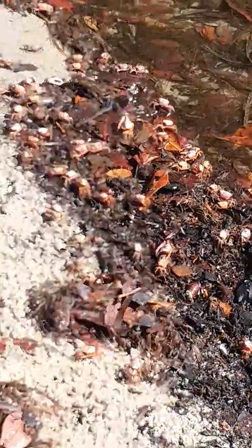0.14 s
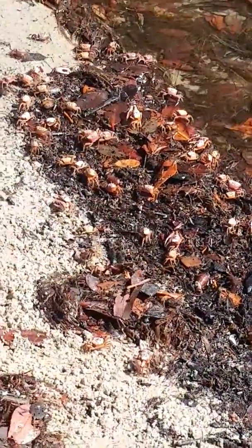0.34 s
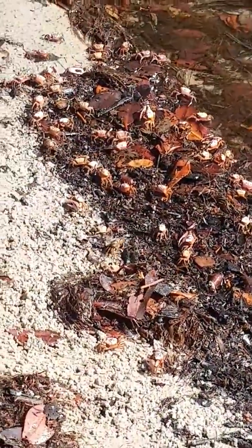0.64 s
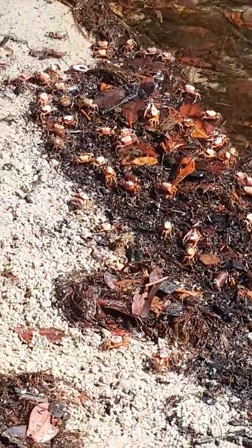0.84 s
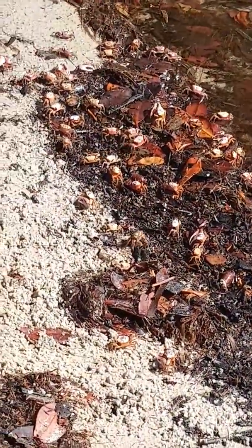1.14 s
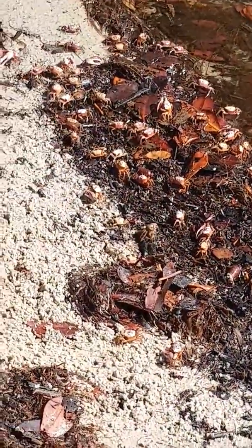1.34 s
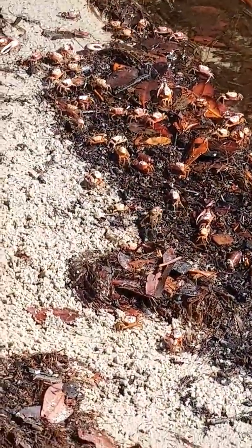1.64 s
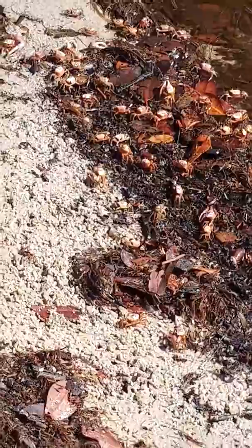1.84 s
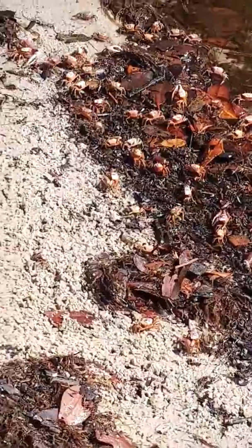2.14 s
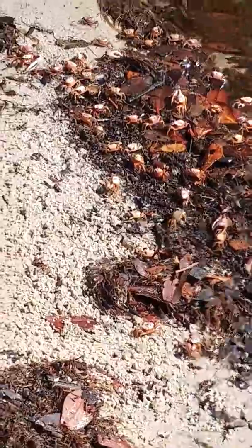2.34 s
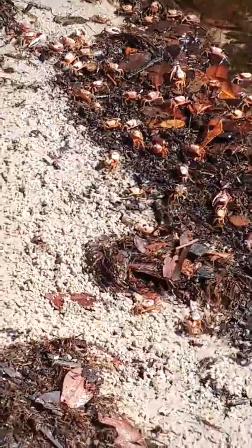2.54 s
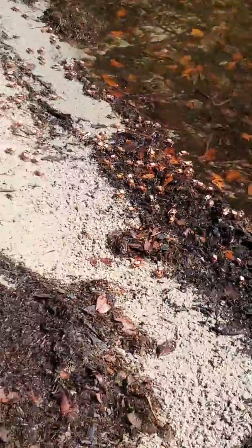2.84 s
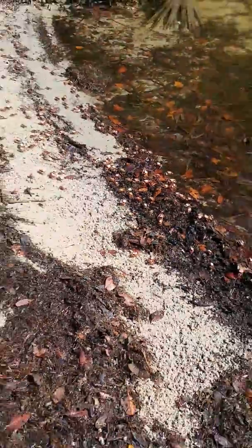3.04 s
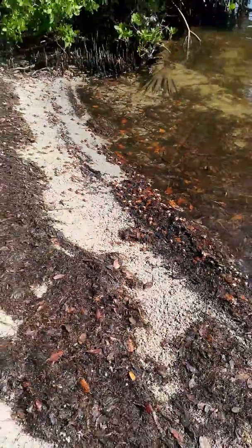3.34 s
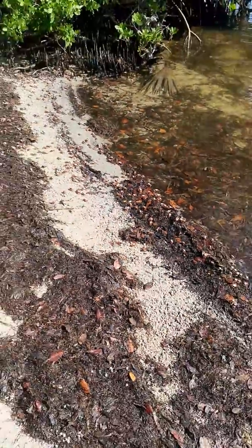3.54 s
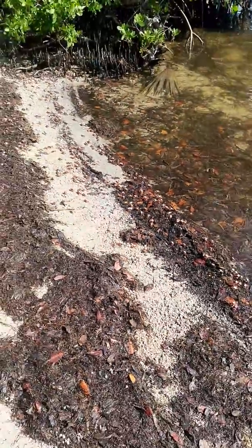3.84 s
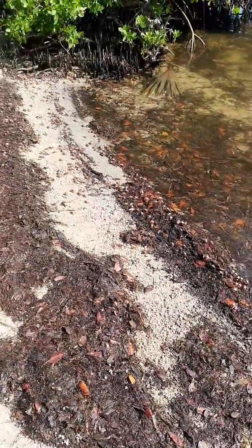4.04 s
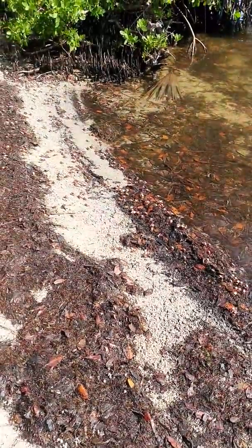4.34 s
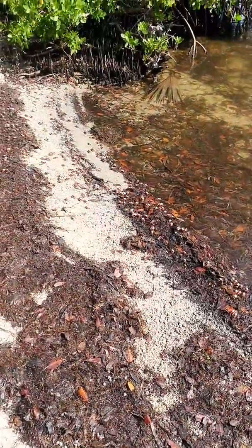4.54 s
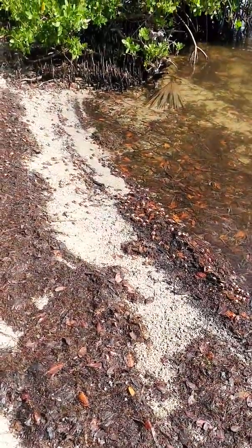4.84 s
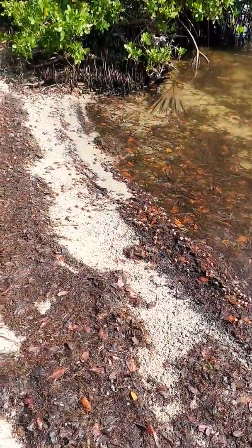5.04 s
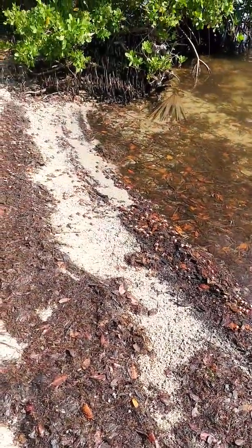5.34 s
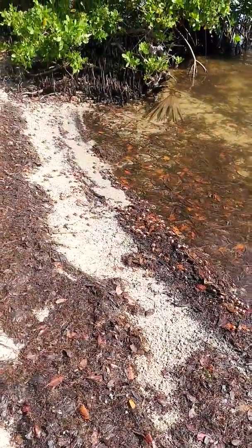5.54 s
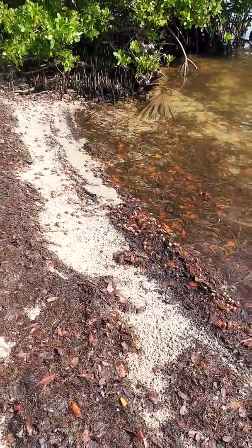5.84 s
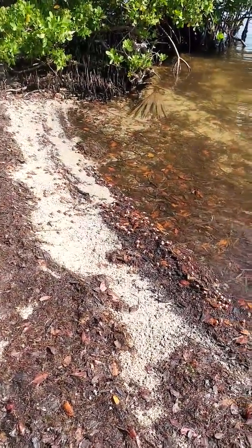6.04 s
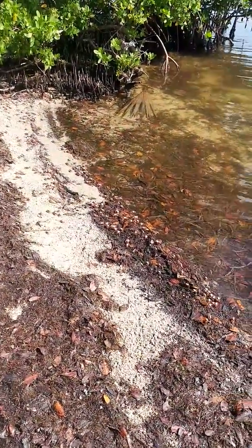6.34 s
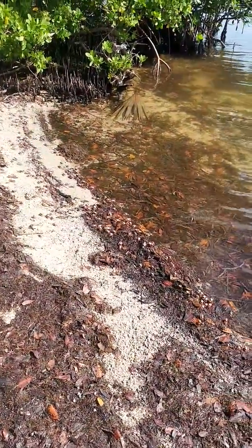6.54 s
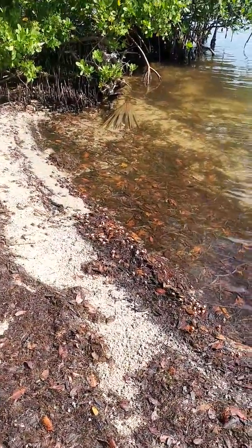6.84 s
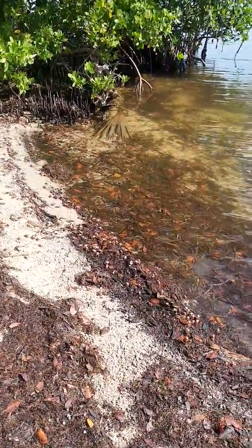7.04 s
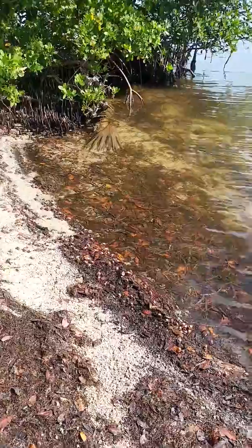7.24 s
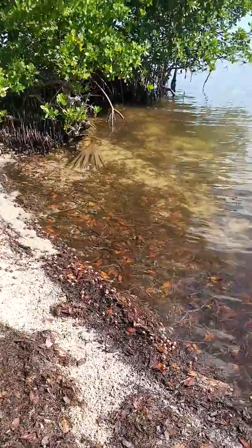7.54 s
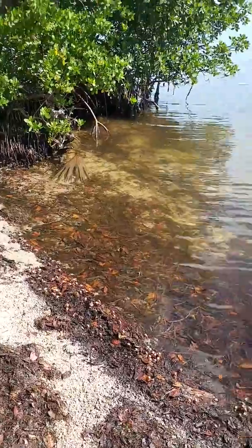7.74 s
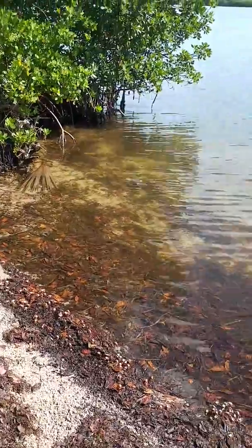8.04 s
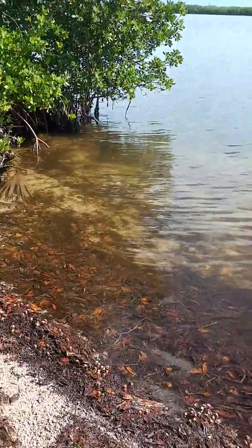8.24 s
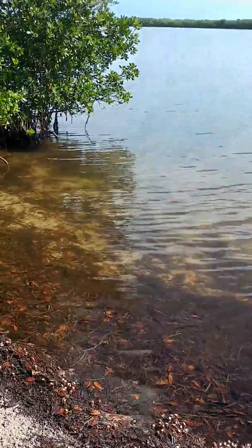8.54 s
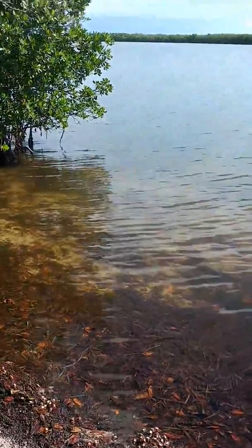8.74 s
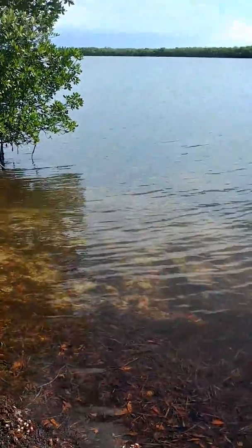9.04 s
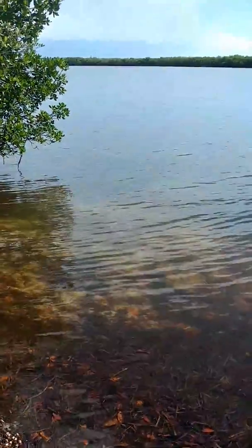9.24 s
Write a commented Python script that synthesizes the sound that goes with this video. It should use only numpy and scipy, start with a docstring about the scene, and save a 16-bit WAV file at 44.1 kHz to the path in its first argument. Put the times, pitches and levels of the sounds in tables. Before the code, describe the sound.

Outdoors at a shore, a katydid whines continuously over a brighter insect sizzle, while wind buffets the microphone at the beginning and near the end.

```python
"""A near katydid buzzes at about 8 kHz on the right and a higher chorus sizzles on the left of a mangrove shore.
Both are wing strokes, rasp and snaps, coloured by spectra; resonances on the strokes add whines and wing tones.
The katydid drops briefly four times. Gusts of banded noise buffet two microphone ports; short swings thump them.
A faint far rumble of dull noise lies over the water; later, short bands of grainy noise lap as ripples."""
import sys
import numpy as np
from scipy import signal
from scipy.fft import rfft, irfft, next_fast_len
from scipy.io import wavfile
from scipy.ndimage import uniform_filter1d

SR = 44100
rng = np.random.default_rng(int(sys.argv[2]) if len(sys.argv) > 2 else 0)


def bounce(signal):
    """Save signal as a 16-bit WAV file at the path given by the first command-line argument."""
    frames = np.transpose(np.atleast_2d(signal))
    limited = np.clip(frames, -1, 1)
    pcm = np.round(limited * 32767).astype(np.int16)
    wavfile.write(sys.argv[1], SR, pcm)


N = 413658
TIME = np.arange(N) / SR
FFT_SIZE = next_fast_len(N, real=True)
FFT_HZ = np.fft.rfftfreq(FFT_SIZE, 1 / SR)


def gain_of(db):
    """Decibels to amplitude."""
    return 10 ** (np.asarray(db) / 20)


def evened(x):
    """Scales to rms 1."""
    return x / np.sqrt(np.mean(x ** 2) + 1e-20)


def steadied(x, size_samples):
    """Holds each channel at its own mean level, over spans of size_samples."""
    power = x ** 2
    mean_power = power.mean(1, keepdims=True)
    local_power = uniform_filter1d(power, size_samples) + 1e-20
    return evened(x * np.sqrt(mean_power / local_power))


def curves(rows):
    """Each column of a table as a curve over time."""
    time_s, *columns = np.transpose(rows)
    return [np.interp(TIME, time_s, column) for column in columns]


def colour(x, rows):
    """Filters by a spectrum with one column, or one per channel; rms 1."""
    hz, *columns = np.transpose(rows)
    shape_db = [np.interp(np.log(FFT_HZ + 1), np.log(hz), column) for column in columns]
    spectrum = rfft(x, FFT_SIZE) * gain_of(shape_db)
    return evened(irfft(spectrum, FFT_SIZE)[:, :N])


def band_noise(low_hz, high_hz, order):
    """Noise between two edges, unrelated in the two channels; rms 1."""
    edges = signal.butter(order, [low_hz, high_hz], "bandpass", fs=SR, output="sos")
    return evened(signal.sosfilt(edges, rng.standard_normal((2, N))))


def drift(hz):
    """Slow chance of rms 1, up to the given rate."""
    knots_s = np.arange(0, TIME[-1] + 1 / hz, .5 / hz)
    return evened(np.interp(TIME, knots_s, rng.standard_normal(len(knots_s))))


def hump(middle_s, length_s):
    """A smooth rise and fall of height 1, length_s wide at 1/e."""
    out = np.zeros(N)
    near = slice(*np.searchsorted(TIME, [middle_s - 2 * length_s, middle_s + 2 * length_s]))
    out[near] = np.exp(-(2 * (TIME[near] - middle_s) / length_s) ** 2)
    return out


def resonate(x, hz, width_hz):
    """A steep moving resonance of gain 1: shift the curve hz down to zero, smooth twice, shift back."""
    turn = np.exp(2j * np.pi * np.cumsum(hz) / SR)
    r = np.exp(-np.pi * width_hz / SR)
    smooth = signal.lfilter([(1 - r) ** 2], [1, -2 * r, r * r], x * turn.conj())
    return 2 * (turn * smooth).real


def foliage(x, spread_s, count):
    """Scattered reflections from leaves, roots and ground, different at each ear."""
    taps = np.zeros((2, SR // 4))
    for ear in taps:
        delay = np.minimum(rng.exponential(spread_s, count) * SR, len(ear) - 1).astype(int)
        ear[delay] = rng.standard_normal(count)
        ear /= np.linalg.norm(ear)
    return signal.oaconvolve(x[None], taps, axes=1)[:, :N]


def shifting_echoes(x, spread_s, rad_per_s):
    """Two sets of reflections trade places as the listener moves."""
    turn = rad_per_s * TIME
    first = foliage(x, spread_s, count=24)
    second = foliage(x, spread_s, count=24)
    return np.cos(turn) * first + np.sin(turn) * second


PORT_LAG_S = .00045


def at_ports(x):
    """The song reaches the right port a moment after the left."""
    return np.array([x, np.roll(x, round(PORT_LAG_S * SR))])


def stridulate(strokes_per_s, width, rasp, jitter, uneven_db):
    """Each wing stroke drags a scraper over a file: a swell of rasp with one hard snap at its middle."""
    # width and jitter in strokes; rasp is its share of the power
    turns = np.cumsum(strokes_per_s * np.ones(N)) / SR + rng.random() + jitter * drift(60)
    snaps = np.diff(np.floor(turns + .5), prepend=np.floor(turns[0] + .5))
    teeth = np.exp(-abs(turns % 1 - .5) / width) * rng.standard_normal(N)
    strokes = np.sqrt(1 - rasp) * evened(snaps) + np.sqrt(rasp) * evened(teeth)
    return evened(strokes * gain_of(uneven_db * drift(77)))


# katydid pauses: middle_s, length_s, depth_db
PAUSES = [(3.312, 0.032, -11), (4.187, 0.084, -13), (7.157, 0.071, -15), (7.983, 0.047, -22)]


def resting_db():
    """How far the near singer's level drops as it pauses."""
    return sum(depth_db * hump(middle_s, length_s) for middle_s, length_s, depth_db in PAUSES)


def whine(strokes, hz, wander_hz=20, left_db=-11):
    """One wing rings at its own wandering pitch under the strokes; the left side hears it only by reflection."""
    ring = resonate(strokes, hz + wander_hz * drift(2.8), width_hz=300)
    ring = ring / np.sqrt(uniform_filter1d(ring ** 2, size=2400) + 1e-12)
    reflection = gain_of(left_db) * np.roll(ring, SR // 54)
    return np.array([reflection, ring])


# katydid buzz loudness: time_s, relative_db
KATYDID_LOUDNESS = [(0, 0), (0.28, -3), (0.9, -2), (1.55, 1), (1.8, 1), (2.5, 1), (3.08, 0), (3.25, -1),
                    (3.6, 1), (3.8, -1.5), (4.45, 1), (4.9, -2), (5.4, 0.5), (5.95, 0), (6.85, 0),
                    (7.31, 0.5), (7.59, 2), (7.8, 1.5), (8.4, -0.5), (8.62, 0.5), (8.9, -1.5), (9.38, -0.5)]
# ring of its wings, spectrum shape: pitch_hz, left_relative_db, right_relative_db
WING_RING = [(4000, -140, -140), (4950, -123, -119), (5400, -105, -98.5), (6000, -104, -99.5),
             (6500, -101, -97), (6750, -95, -86), (7100, -86, -75), (7400, -83, -72), (7650, -79, -68),
             (8150, -76, -66.5), (8450, -74, -68.5), (8800, -80, -78), (9150, -76, -78),
             (10200, -69, -75.5), (12000, -72, -79.5), (13000, -80, -88), (14600, -83, -90),
             (15600, -87, -100)]
# whine of its two wings, before pauses and flutter: time_s, lower_hz, lower_db, upper_hz, upper_db
WING_WHINES = [(0, 7780, -48, 8150, -37), (.3, 7780, -49, 8130, -42), (1.1, 7900, -40, 8120, -34.5),
               (1.55, 7870, -33, 8130, -30.5), (1.8, 7850, -40, 8060, -38), (2.1, 7850, -40, 8080, -33),
               (2.55, 7900, -37, 8080, -31), (3.1, 7900, -35, 8070, -31), (3.27, 7800, -37, 8100, -39),
               (3.55, 7800, -37, 8160, -31.5), (4.1, 7750, -42, 8120, -39), (4.6, 7720, -39, 8080, -37.5),
               (5.6, 7750, -46, 8080, -38), (5.9, 7720, -42, 8100, -46), (6.3, 7690, -33, 8080, -40),
               (6.78, 7620, -29.5, 8150, -35), (6.95, 7630, -32.5, 8200, -30.5),
               (7.28, 7700, -43, 8150, -42), (7.58, 7700, -31.5, 8100, -34.5), (7.85, 7700, -36, 8150, -39),
               (8.4, 7800, -34, 8180, -33), (8.62, 7800, -39, 8170, -38), (8.9, 7800, -30.5, 8180, -31),
               (9.1, 7850, -30, 8120, -35), (9.38, 7800, -37, 8170, -37)]
# slowing around a pause: depth, and time either side
STROKES_PER_S, SAG_PER_S, SAG_S = 108.2, 3, .11


def katydid(level_db=-33.0, scatter_db=0.0, flutter_db=0.58):
    """The near singer: a fast buzz that slows around each pause, with a whine from each of its two wings."""
    sag = SAG_PER_S * sum(hump(middle_s, 2 * SAG_S) for middle_s, _, _ in PAUSES)
    rate = STROKES_PER_S - sag + .15 * drift(1.5)
    song = stridulate(rate, width=.2, rasp=.76, jitter=.003, uneven_db=.6)
    echoes = shifting_echoes(song, spread_s=.004, rad_per_s=1.473)
    buzz = colour(at_ports(song) + gain_of(scatter_db) * echoes, WING_RING)
    strokes = np.roll(buzz[1], round(3 * SR / STROKES_PER_S))  # three strokes late
    # the singer keeps an even effort
    buzz = steadied(buzz, size_samples=2000) * gain_of(level_db + curves(KATYDID_LOUDNESS)[0])
    low_hz, low_db, high_hz, high_db = curves(WING_WHINES)
    whines = gain_of(low_db) * whine(strokes, low_hz) + gain_of(high_db) * whine(strokes, high_hz)
    return (buzz + whines) * gain_of(resting_db() + flutter_db * drift(7))


# wing tones drifting through the chorus: pitch_hz, start_relative_db, end_relative_db
WING_TONES = [(10150, -2, -3), (10480, 0, 0), (10800, 1.5, -5), (11030, -3, 0), (11270, -3, -3),
              (11680, -2, -1), (12150, -6, -6)]


def wing_tones(song, level_db, right_db=-21):
    """Narrow wing tones, mostly on the left, wander in pitch; each swells and sinks on its own."""
    out = np.zeros(N)
    for hz, start_db, end_db in WING_TONES:
        tone = resonate(song[:1], hz + 65 * drift(1.5), width_hz=160)
        tone = steadied(tone, size_samples=3000)[0]
        swell = evened(gain_of(3.5 * drift(2.5)))
        out += tone * swell * np.geomspace(gain_of(start_db), gain_of(end_db), N)
    return gain_of(level_db) * gain_of([[0], [right_db]]) * at_ports(out)


# leading singers: strokes_per_s, relative_db
CHORUS_LEADERS = [(98.1, 0), (108.3, -2), (89.3, -6), (117.6, -6), (203, -6)]
# chorus spectrum shape: pitch_hz, left_relative_db, right_relative_db
CHORUS_COLOUR = [(4000, -140, -140), (5000, -121, -120), (6300, -107, -105), (7000, -97, -88),
                 (8000, -80, -75), (8500, -80, -80), (9100, -78, -83), (9550, -66.5, -76.5),
                 (10200, -58.5, -78), (10700, -57, -78), (11300, -58, -79), (11750, -58, -78),
                 (12700, -67, -83.5), (14400, -71.5, -86), (15600, -75.5, -95)]
# chorus swell: time_s, relative_db
CHORUS_SWELL = [(0.0, -27.5), (0.89, -27), (1.05, -29.5), (1.19, -27), (1.3, -27.5), (1.65, -26.5),
                (2.13, -27), (2.38, -26.5), (2.94, -28), (3.69, -26.5), (4.4, -28.5), (4.8, -26.5),
                (5.26, -28.5), (5.33, -27), (6.51, -27), (6.88, -26), (7.34, -29), (7.54, -27.5),
                (7.62, -29.5), (8.3, -26.5), (8.62, -29), (8.84, -26.5), (9.19, -28.5), (9.37, -27.5)]


def chorus(level_db=2.0, crowd_db=0, scatter_db=-1, waver_db=0.32, hush=0.13):
    """A few singers and wing tones stand out from a crowd blurred to a sizzle; it dips a little at each pause."""
    leaders = 0
    for strokes_per_s, db in CHORUS_LEADERS:
        rate = strokes_per_s + .3 * drift(2)
        leaders += gain_of(db) * stridulate(rate, width=.36, rasp=.93, jitter=.005, uneven_db=.6)
    leaders = evened(leaders)
    crowd = shifting_echoes(rng.standard_normal(N), spread_s=.003, rad_per_s=2.13)
    crowd = evened(crowd + 0.86 * rng.standard_normal((2, N)))
    near_echoes = foliage(leaders, spread_s=.0004, count=6)
    echoes = shifting_echoes(leaders, spread_s=.007, rad_per_s=1.94)
    song = near_echoes + gain_of(scatter_db) * echoes + gain_of(crowd_db) * crowd
    song = colour(song, CHORUS_COLOUR)
    song = song + wing_tones(np.roll(song, SR // 20, axis=1), level_db=-7.5)
    song = steadied(song, size_samples=1800)  # so many voices keep a steady sum
    swell_db = curves(CHORUS_SWELL)[0] + waver_db * drift(6) + hush * resting_db()
    return gain_of(level_db + swell_db) * song


# gusts: peak_s, length_s, left_strength_db, right_strength_db
GUST_ROWS = [(0.036, 0.062, -34, -47), (0.085, 0.059, -34.5, -41), (0.156, 0.047, -46, -42),
             (0.233, 0.031, -54, -36.5), (0.34, 0.09, -51, -40.5), (0.503, 0.054, -44, -47.5),
             (0.617, 0.099, -41.5, -51), (0.765, 0.029, -45, -66), (0.913, 0.02, -39.5, -47),
             (0.993, 0.031, -52.5, -58), (1.692, 0.064, -54.5, -75), (1.923, 0.06, -45.5, -62),
             (2.094, 0.036, -38.5, -61), (2.266, 0.025, -60, -49), (2.311, 0.041, -39, -48),
             (2.37, 0.072, -45, -53), (2.543, 0.054, -48.5, -53), (2.637, 0.065, -50.5, -56),
             (2.87, 0.059, -53.5, -74), (3.457, .04, -54.5, -63), (6.78, 0.069, -55, -75),
             (6.96, 0.046, -44, -66), (7.053, 0.073, -35.5, -61), (7.106, 0.055, -38.5, -59),
             (7.188, 0.11, -46.5, -61), (7.571, 0.13, -55, -50), (7.716, 0.049, -46.5, -43.5),
             (7.939, 0.036, -51, -38.5), (8.018, 0.074, -44, -43), (8.127, 0.024, -40.5, -36),
             (8.153, 0.065, -36, -38), (8.207, 0.08, -39.5, -38), (8.273, 0.066, -48, -39.5),
             (8.375, 0.11, -52, -47.5), (8.475, 0.078, -45, -39.5), (8.515, 0.043, -43.5, -39.5),
             (8.615, 0.059, -50.5, -61), (8.722, 0.059, -45, -38), (8.766, 0.034, -58, -37.5),
             (8.868, 0.074, -59, -39), (8.971, 0.027, -52, -40), (9.047, 0.073, -50, -47.5),
             (9.311, 0.095, -42, -35)]
# eddies in a gust, large to small: low_hz, high_hz, relative_db at full gust, growth_db_per_db of strength
EDDY_BANDS = [(51, 108.5, 2, 0.75), (107, 209.6, -3, 1.74), (205, 473, -19, 3.5), (419, 670, -31, 4.5)]
FULL_GUST_DB = -40


def wind(level_db=-40, calm_db=-64, lumpy_db=2, stir_db=-14, stir_s=0.28, stir_cap_db=-40):
    """Gusts hit each port on its own amid a longer, weaker stir; harder ones shed more small eddies."""
    power = np.full((2, N), 1e-12)
    for peak_s, length_s, *ports_db in GUST_ROWS:
        port_stir_db = stir_db + np.minimum(ports_db, stir_cap_db)  # on both sides of the peak
        for strength_db, span_s in [(ports_db, length_s), (port_stir_db, stir_s)]:
            near = slice(*np.searchsorted(TIME, [peak_s - 2 * span_s, peak_s + 2 * span_s]))
            power[:, near] += np.outer(gain_of(strength_db), hump(peak_s, span_s)[near]) ** 2
    port_db = 10 * np.log10(power)
    blowing = 1 / (1 + gain_of(calm_db - port_db) ** 2)  # fades out below calm_db
    out = np.zeros((2, N))
    for low_hz, high_hz, db, growth in EDDY_BANDS:
        eddies = band_noise(low_hz, high_hz, order=4)
        eddies /= np.sqrt(uniform_filter1d(eddies ** 2, size=1400) + 0.039)  # the gust sets the swell
        out += eddies * gain_of(db + growth * (port_db - FULL_GUST_DB))
    return gain_of(level_db + lumpy_db * drift(40)) * blowing * out


# thumps of single large eddies: middle_s, left_relative_db, right_relative_db, pitch_hz
THUMP_ROWS = [(.033, -22.5, -42, 192), (0.08, -22, -40, 120), (.111, -31, -36, 80), (0.232, -50, -27, 127),
              (.277, -46, -28.5, 90), (2.096, -23, -60, 122), (2.309, -21, -44, 69.4),
              (2.333, -30, -46, 70.6), (7.04, -25, -60, 110), (7.058, -20.5, -58, 263),
              (7.088, -24, -60, 86), (8.131, -36, -24.5, 80), (8.145, -28, -27, 100),
              (8.165, -26, -33, 150), (8.204, -24, -34, 70), (8.267, -40, -31.5, 89), (8.292, -44, -30, 70),
              (8.732, -44, -23, 129), (8.775, -56, -24, 70), (9.298, -48, -23.5, 110),
              (9.317, -36, -26.5, 80), (9.35, -39, -28, 65)]


def thumps(level_db=-1, cycles=0.67):
    """A large eddy strikes a port and pushes and pulls it once or twice."""
    out = np.zeros((2, N))
    t = np.arange(-1400, 1400) / SR
    phases = rng.random((len(THUMP_ROWS), 2, 1))  # one per port, in turns
    for (middle_s, left_db, right_db, hz), phase in zip(THUMP_ROWS, phases):
        envelope = np.exp(-(t * hz / cycles) ** 2)
        swing = envelope * np.cos(2 * np.pi * (hz * t + phase))
        at = np.clip(round(middle_s * SR) + np.round(t * SR).astype(int), 0, N - 1)
        out[:, at] += gain_of([[left_db], [right_db]]) * swing
    return gain_of(level_db) * out


# far rumble spectrum shape: pitch_hz, relative_db
FAR_COLOUR = [(15, -50), (38, -8), (65, 1.5), (120, -.5), (185, -8), (330, -11.5), (430, -10), (535, -1),
              (760, -10.5), (1220, -23.5), (2900, -29.5), (4500, -28.5), (6000, -43)]
# its slow swell: time_s, relative_db
FAR_RUMBLE_SWELL = [(0, 2), (1, 0.5), (2.3, -1.5), (4.5, -1.9), (6.3, -1.5), (7.4, 0), (8.4, 2), (9.38, -1)]


def far_rumble(level_db=-64, waver_db=1):
    """Dull, distant noise over open water, partly shared by the two channels."""
    noise = rng.standard_normal((2, N)) + 1.14 * rng.standard_normal(N)
    swell_db = curves(FAR_RUMBLE_SWELL)[0] + waver_db * drift(5.5)
    return gain_of(level_db + swell_db) * colour(noise, FAR_COLOUR)


# ripples lapping: middle_s, level_db, pitch_hz, half_length_s (to 1/e)
RIPPLE_LAPS = [(6.863, -78, 2190, 0.12), (6.882, -65, 2000, 0.012), (6.89, -75, 2980, 0.013),
               (7.87, -81, 2500, .06), (8.368, -66, 1780, 0.017), (8.45, -83, 2550, 0.19),
               (8.608, -80, 2930, .016)]


def ripples(fizz_db=3):
    """Soft, grainy laps at the water's edge: short swells of narrow noise with a fast uneven level."""
    laps = np.zeros((2, N))
    for middle_s, db, hz, half_length_s in RIPPLE_LAPS:
        envelope = np.exp(-((TIME - middle_s) / half_length_s) ** 2)
        laps += gain_of(db) * envelope * band_noise(0.92 * hz, 1.11 * hz, order=3)
    return laps * evened(gain_of(fizz_db * drift(90)))


def scene():
    """Insects, wind and water."""
    return katydid() + chorus() + wind() + thumps() + far_rumble() + ripples()


CUT_HZ = 15780


def record(dry):
    """The microphone drops the deepest bass; then the band limit."""
    bass_cut = signal.butter(5, 42, "highpass", fs=SR, output="sos")
    band_limit = signal.firwin(1023, CUT_HZ, window=("kaiser", 9), fs=SR)
    return signal.oaconvolve(signal.sosfilt(bass_cut, dry), band_limit[None], "same")


dry = scene()
out = record(dry)
bounce(out)
```